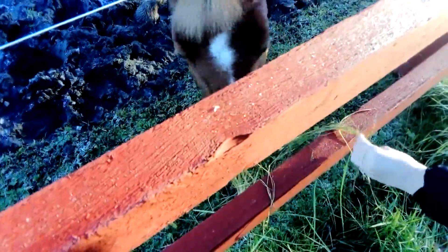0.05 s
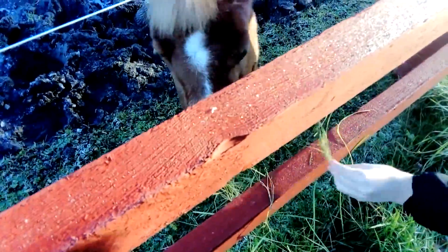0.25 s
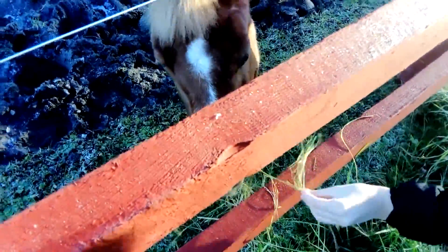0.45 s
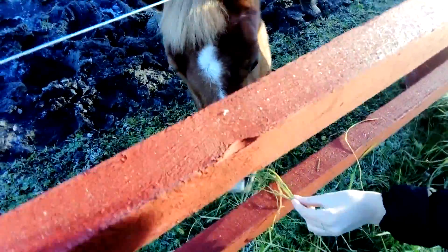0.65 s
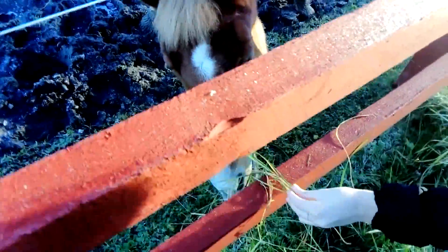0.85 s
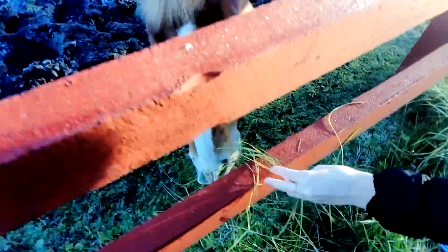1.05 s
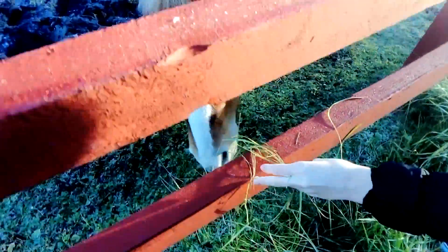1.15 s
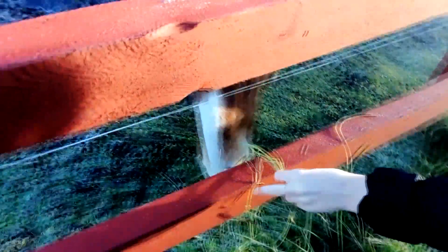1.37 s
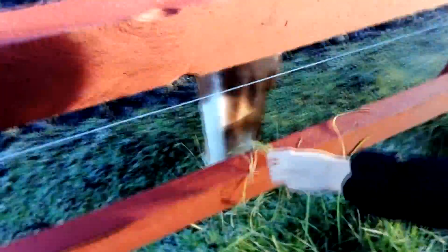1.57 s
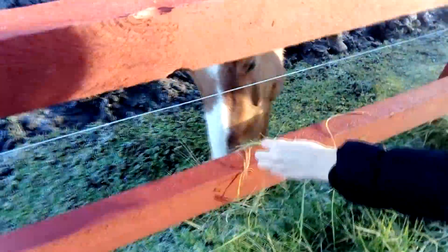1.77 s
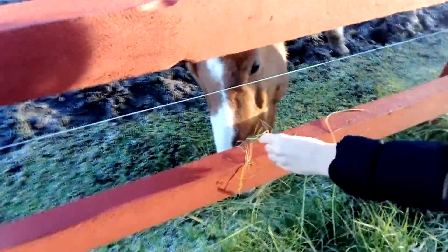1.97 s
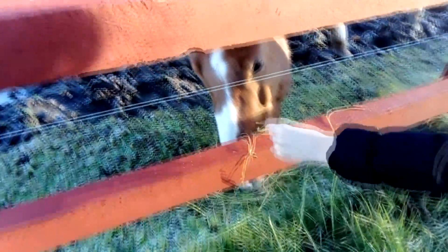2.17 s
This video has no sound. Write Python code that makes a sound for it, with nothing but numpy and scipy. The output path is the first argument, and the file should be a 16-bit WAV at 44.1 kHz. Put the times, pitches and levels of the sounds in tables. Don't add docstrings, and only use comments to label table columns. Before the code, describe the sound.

A horse tugs and tears grass from a hand, with rustling blades and soft wooden fence knocks

```python
import sys
import numpy as np
from scipy import signal
from scipy.fft import rfft, irfft, next_fast_len
from scipy.io import wavfile
from scipy.ndimage import uniform_filter1d, map_coordinates

SR = 44100
rng = np.random.default_rng(int(sys.argv[2]) if len(sys.argv) > 2 else 0)


def elevation(decibels):
    levels = np.asarray(decibels, float)
    return 10 ** (levels / 20)


def dump(signal):
    limited = np.clip(np.atleast_2d(signal).T, -1, 1)
    pcm = np.round(limited * 32767).astype(np.int16)
    wavfile.write(sys.argv[1], SR, pcm)


N = 97681

# (frequency [Hz], gain [dB])
MICROPHONE = [(6600, 1.5), (8200, -11), (11000, -12.5)]
# (frequency [Hz], density [dB per Hz])
HUSH_SPECTRUM = [(20, -17), (100, -2.5), (190, 0), (420, -16), (700, -7.5), (1500, -20), (5600, -23),
                 (15500, -17.5)]
# (time [s], level [dB])
GRIP_LEVEL = [(0, -90), (.4, -66.5), (.5, -56), (0.619, -66.5), (.76, -53), (1.0, -51), (1.3, -53.5),
              (1.45, -47.5), (1.55, -49.5), (1.7, -51.5), (1.85, -51), (2.0, -53), (2.21, -62)]
# (frequency [Hz], density [dB per Hz])
GRIP_SPECTRUM = [(25, -15), (70, -2), (200, 2.5), (400, -13), (800, -46)]
# (start [s], length [s], level [dB], pitch [Hz])
BIRD_PIPES = [(.225, .045, -71, 1570), (.408, .065, -65, 1590), (.466, .02, -68, 1560),
              (.505, .028, -70, 1535), (.535, .07, -70, 1810), (.54, .055, -72, 1550),
              (.775, .025, -64, 2000), (1.08, .085, -58, 2250), (2.03, .066, -59.5, 2550),
              (.27, .15, -80, 5800), (.82, .018, -63, 9500), (.845, .022, -58, 9100),
              (.803, .022, -58, 5800), (.79, .015, -68, 9900)]
# (time [s], peak [dB], centre [Hz], burst [ms])
SMACKS = [(.7, -54, 760, 12), (.888, -38, 1050, 8), (.897, -40, 450, 6), (1.946, -37, 450, 5),
          (1.98, -40, 280, 6), (1.988, -43, 300, 4), (1.996, -42, 900, 8), (2.011, -41, 500, 5),
          (1.361, -34, 1400, 2.5), (1.34, -35, 1500, 6), (1.348, -31, 1600, 2), (1.352, -37, 1200, 8),
          (.415, -50, 420, 2), (2.086, -41, 1200, 2), (2.167, -43, 1500, 2), (1.735, -44, 500, 4),
          (1.575, -42, 900, 8), (1.865, -42, 600, 20)]
# (time [s], peak [dB], pitch [Hz], damping time [ms])
KNOCKS = [
    (.42276, -20.6, 190.5, 2.5),
    (.66204, -15.2, 190, 2.65),
    (.93595, -17.1, 192.5, 2.6),
    (1.18684, -22.6, 198, 2.4),
    (1.73102, -18.1, 189, 2.6),
    (1.9582, -26.5, 190, 2.8),
    (2.19505, -18.4, 190.5, 2.15),
]
# (time [s], peak [dB], pitch [Hz], damping time [ms])
BUMPS = [(0.45, -49, 187, 1.6), (1.03, -48, 93, 9.9), (1.41, -35.5, 94, 4.2), (.76, -60, 110, 2.3),
         (1.25, -43, 95, 5), (1.345, -47, 57, 5.1), (.46, -44, 216, 2.5), (1.474, -35.5, 94, 5.6),
         (1.576, -24, 113.5, 2.8), (1.590, -23.5, 91, 5.05), (1.7, -54, 390, 1.3), (1.5, -41, 98, 5.8),
         (1.668, -36, 113, 5.6), (1.718, -32.5, 97, 4), (2.177, -44, 200, 2.2), (0.65, -44.5, 28, 7.8),
         (1.9397, -33, 363, 3), (2.007, -33, 364, 2.1), (2.012, -38, 220, 1.8), (1.835, -39, 326, 1),
         (.676, -37, 250, 2.5), (1.635, -41, 330, 2)]
# (time [s], peak [dB], centre [Hz], burst [ms])
TICKS = [(1.304, -33, 6300, 1.5), (1.560, -36, 6500, 2.5), (1.561, -45, 3700, 2), (1.5985, -34, 5250, 1.8),
         (1.598, -41, 3400, 2.5), (1.588, -40, 5000, 2), (1.567, -45, 6500, 5), (.884, -42, 15000, 3),
         (.867, -37, 4800, 3), (.868, -38, 6600, 3), (.885, -37, 4700, 2), (.903, -36, 6300, 3),
         (.797, -45, 4000, 3), (1.875, -38, 3900, 2), (1.884, -41, 3900, 4), (1.876, -42, 6300, 3),
         (2.111, -37, 5500, 2), (1.931, -35, 6400, 3), (.666, -57, 5000, 3), (1.767, -46, 6400, 3)]
# (time [s], level [dB], brightness [dB], body [dB])
RUSTLE_EFFORT = [(.72, -99.5, -4, 30), (0.794, -52.5, -3, 6.5), (.83, -51.5, 3.5, 8.5),
                 (0.894, -43.5, 8, 4), (1.0, -44.5, 6.5, 0), (1.15, -45, 7, 2), (1.24, -44.5, 9, 0.5),
                 (1.29, -45.5, 7, 0.5), (1.36, -53.5, 17.5, 12.5), (1.44, -46, 7, 8),
                 (1.492, -56.5, 5, 12.5), (1.62, -50.5, 1, 5), (1.76, -54.5, 0, 2), (1.86, -54.5, -4, 5.5),
                 (1.951, -44.5, 2.5, 0.5), (2.029, -50, 4, 9.5), (2.12, -48, -2.5, 1.5),
                 (2.21, -52, 4, 4.5)]
# (frequency [Hz], density [dB per Hz])
RUSTLE_SPECTRUM = [(200, -16), (400, -4), (1350, -8), (3000, -5), (6000, 1.5), (9000, -6.5), (12000, -9.5),
                   (15500, -4.5)]
# (time [s], pitch [Hz], level [dB])
SLIDE_PATH = [(0.838, 6470, -71), (0.921, 6300, -44.5), (1.02, 5880, -50.5), (1.122, 5300, -55),
              (1.22, 4900, -74)]
# (time [s], peak [dB], centre [Hz], burst [ms])
SNAPS = [(.894, -32, 5900, 3), (1.322, -25, 4900, 1.5), (1.3243, -27, 5000, 2.5), (1.327, -30, 5000, 4),
         (1.333, -33, 5500, 4), (1.341, -34, 4500, 5), (1.352, -35, 5000, 8), (1.3374, -25, 4500, 1.5),
         (1.348, -24, 4500, 1.6), (1.3605, -21, 4500, 1.2), (1.3618, -19, 5000, 1), (1.363, -31, 5500, 3),
         (1.372, -35, 6500, 4), (1.463, -27, 4000, .6), (1.5038, -33, 5500, .8), (2.0093, -23, 5500, 2.2),
         (1.366, -31, 5000, 6), (1.321, -36, 14000, 7), (1.337, -36, 14000, 2), (1.347, -36, 11000, 2),
         (1.361, -34, 13000, 3), (1.304, -39, 11000, 2), (1.534, -50, 14000, 2), (1.575, -48, 12000, 2),
         (1.135, -41, 9000, 14), (1.23, -40, 10000, 25), (.955, -38, 5000, 8), (1.078, -38, 3500, 3),
         (1.42, -44, 12000, 20), (1.962, -41, 14000, 7), (2.007, -39, 12000, 7)]
# (time [s], peak [dB], pitch [Hz], ring [ms], push +1 or pull -1)
POPS = [(1.2231, -32, 520, .8, -1), (1.9443, -31, 600, 2, 1), (1.9445, -35, 1380, 3, 1),
        (1.9568, -35, 560, 1.5, 1), (1.957, -43, 1350, 1.5, 1), (2.009, -31, 2400, .5, -1),
        (2.0094, -32, 700, 1, 1), (2.0105, -38, 1250, 2.5, 1), (1.5036, -15.5, 5600, .14, -1),
        (1.5036, -34, 13000, .05, -1), (.8995, -35, 750, 1.2, 1), (1.3373, -21, 2700, .4, 1),
        (1.3382, -26, 2400, .6, 1), (1.3475, -21, 3900, .3, 1), (1.3242, -28, 1100, .6, 1),
        (1.3615, -29, 1000, .7, -1)]


def unit(x):
    return x / np.sqrt(np.mean(x ** 2) + 1e-20)


def along(points, hz):
    f, v = np.transpose(points)
    return np.interp(np.log(hz + 1), np.log(f + 1), v)


def over_time(table):
    time_s, *columns = np.transpose(table)
    return [np.interp(np.arange(N) / SR, time_s, c) for c in columns]


def wobble(rate_hz):
    knots = rng.standard_normal(int(N * rate_hz / SR) + 4)
    return map_coordinates(knots, [np.arange(N) * rate_hz / SR])


def filtered(x, response):
    m = next_fast_len(len(x) + 8192)
    return irfft(rfft(x, m) * response(np.fft.rfftfreq(m, 1 / SR)), m)[:len(x)]


def microphone(hz):
    return elevation(along(MICROPHONE, hz))


def patchy(depth_db):
    z = signal.stft(rng.standard_normal(N + 512), nperseg=512)[2]
    field = uniform_filter1d(rng.standard_normal(z.shape), size=4, axis=0)
    field = uniform_filter1d(field, size=9, axis=1)
    return unit(signal.istft(z * elevation(depth_db * unit(field)), nperseg=512)[1][:N])


def add(track, start_s, sound):
    part = track[round(start_s * SR):][:len(sound)]
    part += sound[:len(part)]


def thud(db, hz, damp_ms, sag_per_s=6):
    t = np.arange(SR // 10) / SR
    u = t / (damp_ms / 1000)
    swell = (u / 3 * np.exp(1 - u / 3)) ** 5
    sag = 1 + sag_per_s * (.01 - t).clip(-.02)
    return -elevation(db) * swell * np.sin(2 * np.pi * hz * t * sag)


def bursts(rows, width, tail_db, tail_s):
    out, t = np.zeros(N), np.arange(2048) / SR
    for s, db, hz, ms in rows:
        cracks = rng.standard_normal(len(t)) * elevation(3 * rng.standard_normal(len(t)))
        attack = np.minimum(1, (t + 1 / SR) / (ms / 6000))
        clump = np.exp(-(t / (ms / 1000)) ** 2) * attack
        tail = elevation(tail_db) * np.exp(-t / tail_s) * min(ms, 1)

        def response(f):
            resonance = f * width * hz / (hz * hz - f * f + 1j * f * width * hz)
            return microphone(f) * resonance ** 2

        sound = filtered(cracks * (clump + tail), response)
        add(out, s, elevation(db) * sound / np.abs(sound).max())
    return out


def hush():
    level_db, patch_db = -59, 1.8
    return elevation(level_db) * unit(filtered(patchy(patch_db), lambda f: elevation(along(HUSH_SPECTRUM, f))))


def grip():
    lumps_db = 2.5
    level_db, = over_time(GRIP_LEVEL)
    lumpy = rng.standard_normal(N) * elevation(lumps_db * wobble(35))
    return elevation(level_db) * unit(filtered(lumpy, lambda f: elevation(along(GRIP_SPECTRUM, f))))


def bird():
    out = np.zeros(N)
    for s, length_s, db, hz in BIRD_PIPES:
        t = np.arange(round(length_s * SR)) / SR
        waver = wobble(112)[:len(t)]
        swell = elevation(db + 2.5 + 3 * waver) * np.sin(np.pi * t / length_s) ** .7
        phase = 2 * np.pi * hz * t * (1.004 - .16 * t) + .6 * waver
        add(out, s, swell * np.sin(phase))
    return out


def smacks():
    return bursts(SMACKS, width=.8, tail_db=-10, tail_s=.006)


def knocks():
    lead_s, lead_db = .0075, -29
    knuckle_s, bounce_s, bounce_db = .002, .039, -25
    out = np.zeros(N)
    for s, db, hz, ms in KNOCKS:
        add(out, s, thud(db, hz, ms, sag_per_s=3.3))
        add(out, s + knuckle_s, thud(2 * db - 6, 1.8 * hz, .5 * ms))
        add(out, s + bounce_s, thud(db + bounce_db, 1.16 * hz, .54 * ms))
        add(out, s - lead_s, -thud(db + lead_db, 2 * hz, .26 * ms))
    return out


def bumps():
    out = np.zeros(N)
    for s, db, hz, ms in BUMPS:
        add(out, s, thud(db, hz, ms))
    return out


def ticks():
    return bursts(TICKS, width=.18, tail_db=-20, tail_s=.006)


def rustle():
    grains_per_s, grain_db, grain_spread_db, patch_db = 3000, -9.5, 3, 2
    bright_hz, body_hz = 8000, 2530
    level_db, bright_db, body_db = over_time(RUSTLE_EFFORT)
    hits = rng.random(N) < grains_per_s / SR
    grain_gain = elevation(grain_spread_db * rng.exponential(size=N) + 7.3 * wobble(39.9))
    grains = hits * grain_gain * rng.standard_normal(N)
    mix = patchy(patch_db) + elevation(grain_db) * unit(grains)
    x = unit(filtered(mix, lambda f: elevation(along(RUSTLE_SPECTRUM, f))))
    top = filtered(x, lambda f: 1 / (1 + (bright_hz / (f + 1)) ** 8))
    low = filtered(x, lambda f: 1 / (1 + (f / body_hz) ** 4))
    started = np.arange(N) > RUSTLE_EFFORT[0][0] * SR
    gain = elevation(level_db + 2.5 + 1.4 * wobble(29.97)) * started
    return gain * (x - top - low + elevation(bright_db) * top + elevation(body_db) * low)


def slide():
    width_hz = 1000
    hz, level_db = over_time(SLIDE_PATH)
    n = np.arange(N)
    active = (n > SLIDE_PATH[0][0] * SR) * (n < SLIDE_PATH[-1][0] * SR)
    hiss = wobble(width_hz) * np.sin(2 * np.pi * np.cumsum(hz) / SR)
    return elevation(level_db) * active * unit(hiss)


def snaps():
    return bursts(SNAPS, width=1.7, tail_db=-13, tail_s=.006)


def pops():
    low_share = .45
    out, t = np.zeros(N), np.arange(1024) / SR
    for s, db, hz, ms, way in POPS:
        ring = np.exp(-t / (ms / 1000)) * np.sin(2 * np.pi * hz * t)
        ring = filtered(ring, lambda f: microphone(f) * (f / (f - 1j * low_share * hz)) ** 2)
        add(out, s, np.sign(way) * elevation(db) * ring / np.abs(ring).max())
    return out


def scene():
    air = filtered(hush() + bird() + rustle() + slide(), microphone)
    contacts = grip() + knocks() + bumps()
    mouth_and_grass = smacks() + ticks() + snaps() + pops()
    return (air + contacts + mouth_and_grass)[None]


def roll_off(x):
    return signal.sosfilt(signal.butter(12, 16810, fs=SR, output="sos"), x)


def record(dry):
    top_hz = 15950
    mix = filtered(dry[0], lambda f: f < top_hz)[None]
    return roll_off(mix)


dry = scene()
out = record(dry)
dump(out)
```